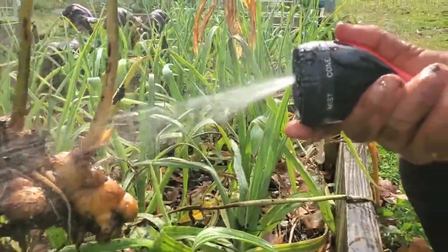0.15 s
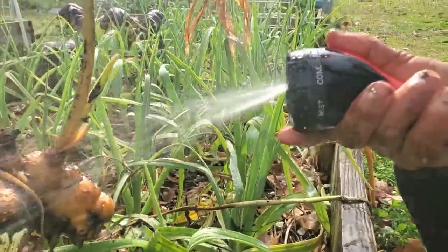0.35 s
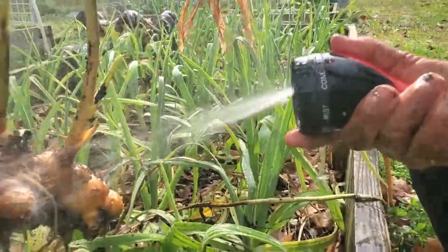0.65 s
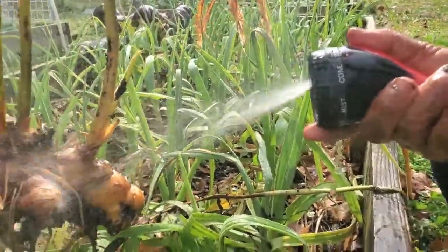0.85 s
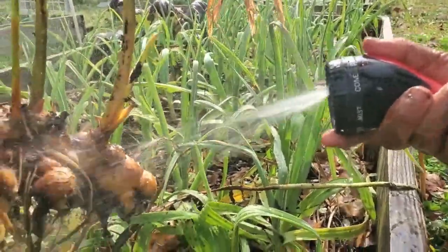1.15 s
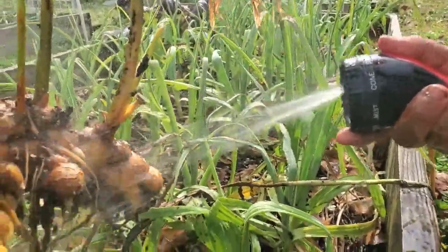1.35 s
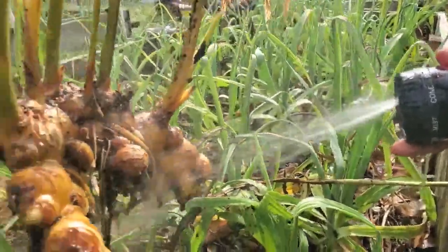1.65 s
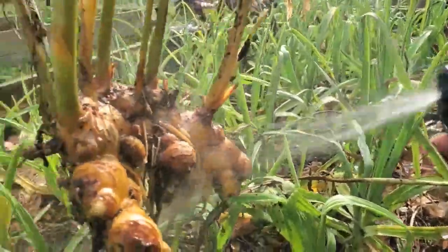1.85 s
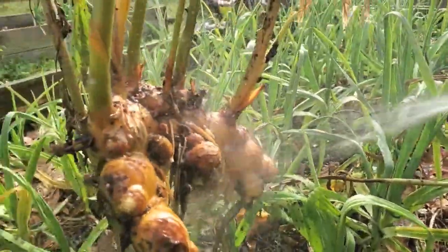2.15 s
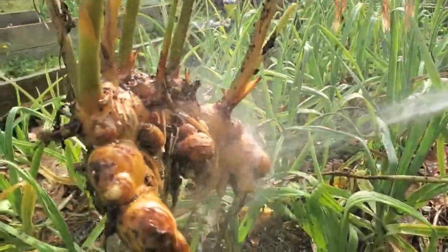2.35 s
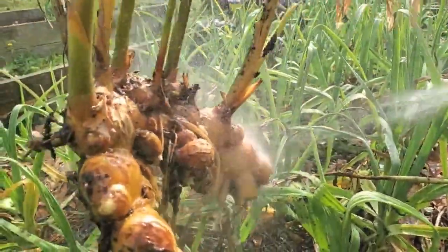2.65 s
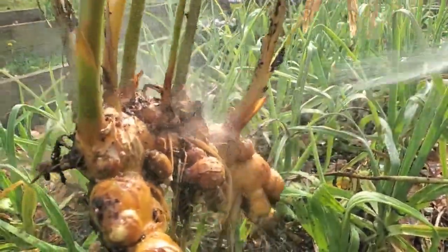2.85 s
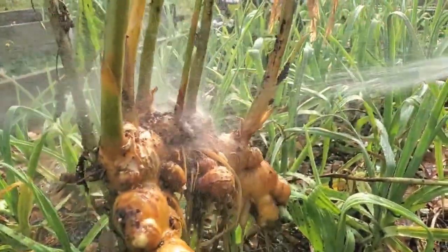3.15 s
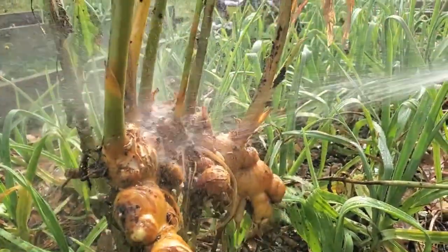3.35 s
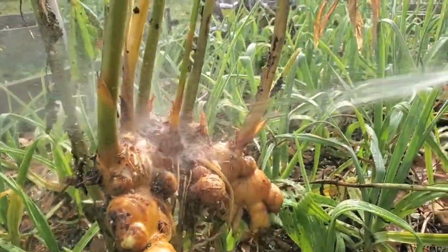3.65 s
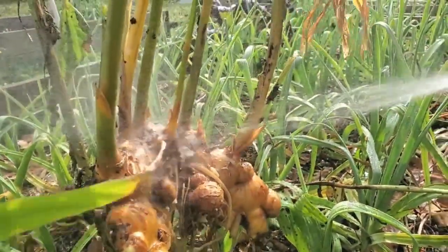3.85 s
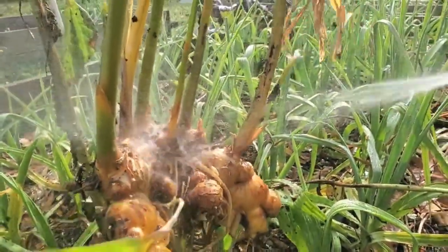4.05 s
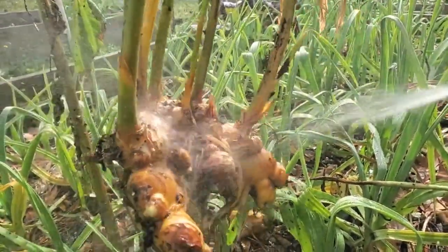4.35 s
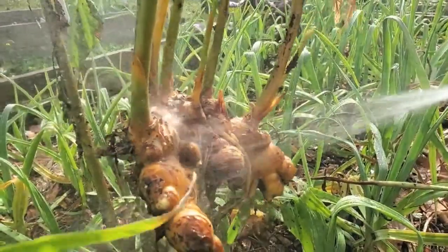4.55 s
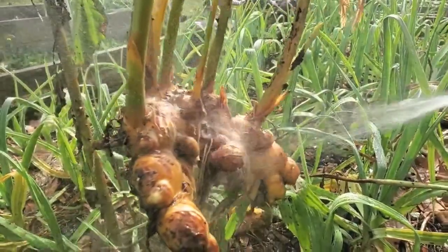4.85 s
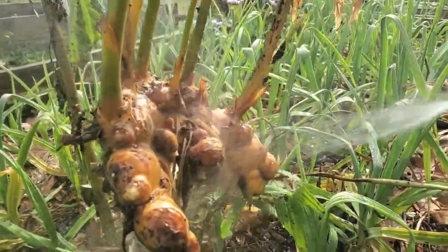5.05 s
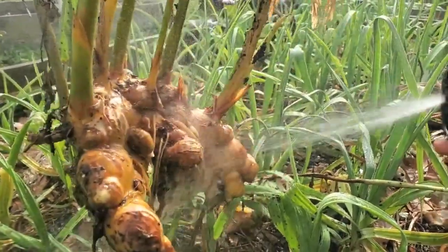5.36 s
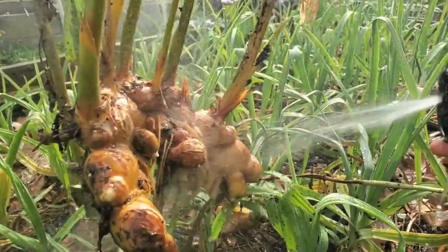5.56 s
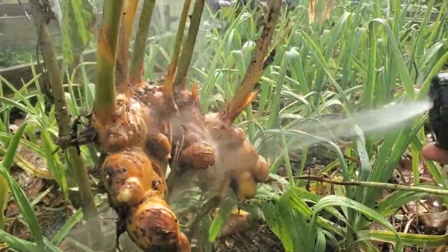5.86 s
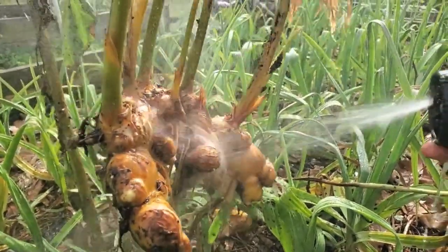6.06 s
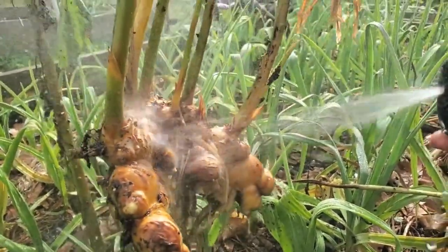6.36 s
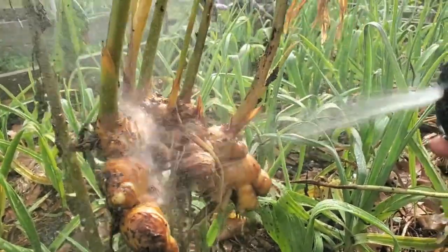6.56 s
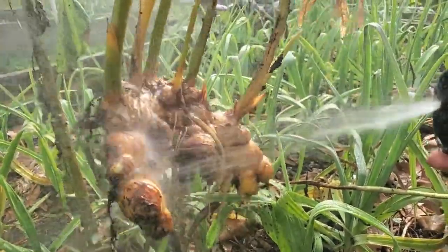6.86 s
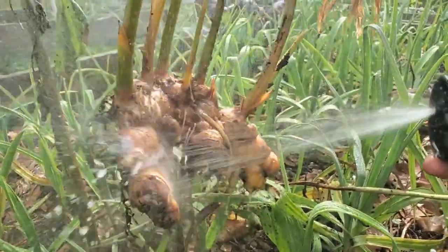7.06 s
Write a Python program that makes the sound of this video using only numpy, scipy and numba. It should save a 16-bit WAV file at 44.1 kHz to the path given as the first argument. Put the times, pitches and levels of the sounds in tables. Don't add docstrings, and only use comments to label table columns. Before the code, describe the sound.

A hose jet strikes a clump of freshly dug roots in an open garden bed, captured close by a hand-held stereo phone for about seven seconds. A dense, bright, steady hiss is already running: thousands of tiny drops crackling on the roots, with thin, very high mist at the nozzle. At 0.1 s the mist dips; from 1 to 1.7 s it is weaker. Around 1.8 s a sudden low wind thump hits the left side and the mist flares, staying fuller afterwards. The splash swells sharply near 2.8 s, then wavers, with a small catch and slip around 4.5 s. Under it, faint run-off patters on soil and leaves, gushing slightly at 3.2 s and briefly, more strongly, at 6.7 s. Soft low buffets recur between 3.6 and 6.7 s. Close, dry, with only short reflections; the spray is still going at the end.

```python
import sys
import numpy as np
from scipy import signal
from scipy.fft import rfft, irfft
from scipy.io import wavfile
from scipy.ndimage import uniform_filter1d
from numba import njit

SR = 44100
rng = np.random.default_rng(int(sys.argv[2]) if len(sys.argv) > 2 else 0)


def to_wav(s):
    ch = np.atleast_2d(s).T
    pcm = np.round(np.clip(ch, -1, 1) * 32767)
    wavfile.write(sys.argv[1], SR, pcm.astype(np.int16))


def undo_db(level):
    steps = np.asarray(level, float) / 20
    return 10 ** steps


N = 318402

# (time [s], level [dB], fine spatter over usual [dB], heavy drops over usual [dB])
SPLASH_DB = [(0, -29.5, 3.5, -1), (.75, -29.5, 1.5, -3.5), (1.3, -30.5, 3, -0.3), (1.8, -30, 1, -1.5),
             (2.03, -33, 0.2, 0.5), (2.67, -29, -4.5, -2), (2.9, -27, -1, -1), (3.17, -28, 2, 1),
             (3.7, -28, -2.7, 0.5), (4.3, -28.5, -1.5, -0.5), (4.75, -30.5, -3, 1.3),
             (5.17, -29.5, 0.5, 0.2), (5.97, -28.5, -3.5, 1.5), (6.41, -29, -0.5, 0.3),
             (6.71, -27, 0.5, -1.2), (7.0, -30.5, 0.5, 2), (7.22, -30, 1, 1.2)]
# (frequency [Hz], density [dB per Hz])
SPLASH_COLOUR_DB = [(2000, -39), (2500, -6.5), (2950, -6.5), (3200, 2.5), (3650, 1.5), (4500, 0.5),
                    (5500, -2.5), (6900, -2.5), (7500, -7), (9000, -7), (11000, -9), (14000, -6)]
# (from [Hz], to [Hz])
SPATTER_HZ = (5500, 7600)
# (from [Hz], to [Hz])
HEAVY_HZ = (3340, 4360)
# (time [s], lead [ms], phase turn [rad])
ROOTS_LEAD_MS = [(0, 0.3, 0), (.9, 0.28, 0), (1.2, 0.16, 0.5), (1.8, 0.16, 0), (1.95, 0.0084, 4),
                 (2.25, -0.044, 3), (2.9, -0.029, 4.5), (3.05, 0.15, 0), (4.6, 0.16, 0), (6.2, 0.16, 0),
                 (6.6, 0.17, 0), (7.22, 0.18, 0)]
# (time [s], share of strays [0-1])
SPLASH_STRAYS = [(0, 0.15), (1.0, 0.22), (1.8, 0.53), (2.2, 0.22), (2.7, 0.37), (3.2, 0.31), (4.5, .35),
                 (5.2, 0.53), (6.4, 0.3), (6.7, .12), (7.22, 0.21)]
# (time [s], half length [s], splash [dB], mist [dB])
JOLTS_DB = [
    (.12, 0.091, -0.5, -4),
    (.82, .1, -1, -1),
    (1.89, .04, 1, 2),
    (2.79, .07, 4.5, 3),
    (4.46, .06, 2, 1),
    (4.53, 0.044, -1.5, -2.5),
    (4.65, 0.11, 1, 2.5),
    (6.67, .08, -1, -0.5),
    (6.92, 0.036, 0, -3),
]
# (time [s], level [dB])
MIST_DB = [(0, -29), (.3, -31), (.72, -32), (.94, -33.5), (1.07, -36), (1.31, -35), (1.69, -35.5),
           (2.07, -30), (2.41, -28.5), (2.67, -30), (3.3, -28), (3.72, -28), (4.2, -29), (4.83, -28.5),
           (5.97, -29.5), (6.17, -27), (6.84, -30), (7.22, -32)]
# (frequency [Hz], density [dB per Hz])
MIST_COLOUR_DB = [(5000, -25), (8500, -13.5), (9380, -7.5), (14700, 1.5), (15200, 0.5), (15800, 6.5)]
# (time [s], lead [ms], phase turn [rad])
NOZZLE_LEAD_MS = [(0, 0.45, -1.5), (.7, 0.65, -3), (1.4, 0.57, -0.5), (2.0, 0.24, 0.5), (2.15, 0.094, 2.7),
                  (2.7, 0.073, 3.5), (3.05, 0.4, 4.5), (4.75, 0.42, 2), (4.95, 0.11, -2.5), (6.2, 0.16, -3),
                  (6.45, 0.43, -4), (7.22, 0.47, -6)]
# (time [s], level [dB], extra on leaves [dB])
PATTER_DB = [(0, -50, 1), (1.5, -50.5, 2), (2.4, -47, -2.5), (3.2, -46, 1.5), (4.3, -48, 0),
             (5.5, -47.5, 1.5), (6.5, -47, .5), (7.22, -47.5, -3.5)]
# (frequency [Hz], density [dB per Hz])
PATTER_COLOUR_DB = [(120, -40), (200, -7.5), (270, -9.5), (390, 0), (480, -8), (660, -1.5), (850, -7.5),
                    (1200, -3.5), (1650, -1), (2200, -0.5), (2700, 1.5), (3200, -17)]
# (time [s], lead [ms], share of strays [0-1])
LEAVES_LEAD_MS = [(0, 0.37, 0.035), (1.1, 0.36, 0.086), (2.0, 0.31, 0.62), (3.0, 0.33, 0.3),
                  (4.6, 0.32, .4), (7.22, 0.28, 0.51)]
# (time [s], half length [s], level [dB])
GUSHES_DB = [
    (3.15, 0.16, 1),
    (6.66, 0.051, 4.5),
]
# (time [s], level [dB], gust edge re level [dB])
WIND_DB = [(0, -45, -8), (.2, -50, -2), (1.6, -48.5, -6.5), (2.0, -40.5, -7), (2.7, -41.5, -9.5),
           (3.4, -45.5, -5.5), (3.9, -41.5, -7), (4.5, -45.5, -6), (5.2, -42, -7), (6.0, -43, -13),
           (6.4, -44.5, -5), (7.22, -43, -10)]
# (frequency [Hz], density [dB per Hz])
WIND_COLOUR_DB = [(12, -43), (20, -17), (45, 0), (70, 6), (173, -11), (200, -27), (260, -36), (440, -120)]
# (frequency [Hz], density [dB per Hz])
EDGE_COLOUR_DB = [(80, 1), (140, 3), (200, -3), (350, -15), (500, -21.5), (800, -38)]
# (time [s], rise time [s], level change [dB], left minus
# right [dB], change of edge re level [dB])
BUFFETS_DB = [(1.755, 0.04, 10, 19, 12), (1.812, 0.014, 4.5, 26, 8), (1.852, 0.046, 7, 27.5, 8),
              (2.13, 0.065, 4.5, 8, -14), (2.27, 0.055, -4, 19, 0), (2.385, .055, 3, 15, 1.5),
              (2.63, .04, 2, 0, -5), (3.58, 0.047, 4, 10, -4), (3.65, 0.048, 8, 5, -4),
              (3.85, .05, 6, 11, -13), (4.04, 0.1, 3.5, 9, -2), (4.44, .05, 4, -1, -4),
              (4.79, .025, 5, 1, -9), (4.87, 0.058, 5, 8, -5), (5.15, 0.046, 6, 15, 0),
              (5.23, 0.027, 2, 11, -9), (5.32, 0.068, 2, 6, -7), (5.63, 0.03, -2, 15, -16),
              (5.69, .03, 6, 8, -10), (5.77, 0.033, 4, 11, -11), (5.99, 0.055, 6.5, 2, -4),
              (6.54, 0.024, 6, 9, -9), (6.62, 0.021, 5, 1.5, -1.5), (6.69, .025, 6, -3, -1)]
# (frequency [Hz], left minus right [dB])
PORTS_DB = [(200, -3.5), (1000, -0.5), (2000, 2), (2800, 1.4), (3300, -1), (4200, 4), (5000, 1.2),
            (5600, 2.5), (7000, 3), (7600, -2.5), (10500, -1.5), (13000, -0.5), (15500, 2.5)]
# (left delay [ms], right delay [ms], level [dB])
BOUNCES_MS = [
    (1.1, 0.784, -17),
    (1.9, 2.3, -15.5),
    (3.1, 2.7, -9),
    (5.3, 6.1, -9),
]


def splash():
    shower = drops(SPLASH_COLOUR_DB, drops_per_s=18000, cycles=3.64, scatter_db=1.0, flicker_db=0.5, surge_db=0.35)
    s, hz = shower[:2]
    db, spatter_db, heavy_db = curves(SPLASH_DB, s)
    jolt_db = bumps(JOLTS_DB, s)[0]
    lead_ms, turn_rad = curves(ROOTS_LEAD_MS, s)
    fine = np.interp(hz, SPATTER_HZ, (0, 1))
    heavy = np.interp(hz, HEAVY_HZ, (1, 0))
    db = db + jolt_db + 3
    db += fine * (spatter_db - 1.4 * jolt_db)
    db += heavy * (heavy_db - 0.21 * jolt_db)
    pan_db = -1.4 - 5 * lead_ms + 0.25 * s
    stray = curves(SPLASH_STRAYS, s)[0]
    return heard(shower, db, pan_db, lead_ms, turn_rad, width_ms=0.014, stray=stray)


def mist():
    usual_db = -29.5
    shower = drops(MIST_COLOUR_DB, drops_per_s=22000, cycles=2.95, scatter_db=1.5, flicker_db=0.7, surge_db=0.38)
    s = shower[0]
    db = curves(MIST_DB, s)[0] + bumps(JOLTS_DB, s)[1]
    lead_ms, turn_rad = curves(NOZZLE_LEAD_MS, s)
    pan_db = 1.5 + 12 * lead_ms - 0.7 * (db - usual_db)
    return heard(shower, db + 3, pan_db, lead_ms, turn_rad, width_ms=0.018, stray=0.48)


def patter():
    shower = drops(PATTER_COLOUR_DB, drops_per_s=5500, cycles=3.27, scatter_db=0.84, flicker_db=0.62, surge_db=0.36)
    s, hz = shower[:2]
    db, leaves_db = curves(PATTER_DB, s)
    lead_ms, leaf_stray = curves(LEAVES_LEAD_MS, s)
    leafy = np.interp(np.log(hz), np.log((750, 2000)), (0, 1))
    soil_stray = np.interp(hz, (300, 600), (0.08, 0.3))
    db = db + bumps(GUSHES_DB, s)[0] + 7.5 + leafy * leaves_db
    stray = soil_stray * (1 - leafy) + leaf_stray * leafy
    return heard(shower, db, 2.4, leafy * lead_ms, 0, width_ms=0.0056, stray=stray)


def wind():
    s, ms = np.arange(N) / SR, np.arange(N) * 1000 // SR
    db, edge_db = curves(WIND_DB, s)
    rise_db, pan_db, bright_db = bumps(BUFFETS_DB, s, tail=1.6)
    db = db + rise_db
    edge_db = edge_db + bright_db
    pan_db = pan_db + 2
    ports_db = np.array([pan_db, -pan_db]) / 2
    hz = np.maximum(np.arange(N // 2 + 1) * SR / N, 1)
    band = (hz < 2000) * (hz > 27)
    shared = 2.4 * undo_db(-1.1 * np.abs(pan_db))
    out = 0
    for colour, layer_db, lumps_db in ((WIND_COLOUR_DB, db, 1.75), (EDGE_COLOUR_DB, db + edge_db, 3.25)):
        noise = rfft(rng.standard_normal((3, N)))
        common, left, right = irfft(noise * undo_db(colour_db(colour, hz)) * band, N)
        air = (np.array([left, right]) + shared * common) / np.sqrt(1 + shared ** 2)
        air = air * undo_db(lumps_db * walk(28, count=2)[:, ms])
        out = out + unit(air) * undo_db(layer_db + 1.4 + ports_db)
    return out


def drops(colour, drops_per_s, cycles, scatter_db, flicker_db, surge_db):
    chance = rng.random((int(drops_per_s * N / SR), 4)).T
    s = chance[0] * N / SR
    lo_hz, hi_hz = colour[0][0], min(colour[-1][0], 0.45 * SR)
    hz = lo_hz * (hi_hz / lo_hz) ** chance[1]
    decay = hz / SR / cycles
    ms, size_class = (s * 1000).astype(int), (chance[1] * 8).astype(int)
    surge = walk(3.78)[0, ms] + walk(12)[0, ms] + walk(60)[0, ms]
    flicker = walk(7, count=8)[size_class, ms]
    flow_db = surge_db * surge + flicker_db * flicker
    strength_db = scatter_db * np.minimum(-np.log(1 - chance[2]), 4)
    size = undo_db(colour_db(colour, hz) + flow_db + strength_db) * np.sqrt(hz * decay)
    return s, hz, decay, size * np.sign(chance[3] - 0.5)


def heard(shower, db, pan_db, lead_ms, turn_rad, width_ms, stray):
    s, hz, decay, size = shower
    place = rng.standard_normal((len(s), 2)).T
    spread_ms = np.where(np.abs(place[1]) < 1.1 * stray, 3, width_ms)
    lag = (lead_ms + spread_ms * place[0]) * SR / 1000
    turn = 2 * np.pi * hz / SR
    power = np.sum(size ** 2 / decay) / N * 0.099
    gain = size * undo_db(db) / np.sqrt(power)
    pan_db = pan_db + colour_db(PORTS_DB, hz)
    left_size = gain * undo_db(pan_db / 2) + 0j
    right_size = gain * undo_db(-pan_db / 2) * np.exp(-1j * turn_rad)
    left = rings(N, s * SR, turn, decay, left_size)
    right = rings(N, np.maximum(s * SR + lag, 0), turn, decay, right_size)
    return np.array([left, right])


@njit
def rings(n, start, turn, decay, size):
    out = np.zeros(n + 4096)
    for k in range(len(start)):
        i = int(start[k]) + 1
        slow, fast = complex(-decay[k], turn[k]), complex(-4 * decay[k], turn[k])
        z = size[k] * np.exp(slow * (i - start[k]))
        w = size[k] * np.exp(fast * (i - start[k]))
        p, q = np.exp(slow), np.exp(fast)
        for j in range(min(int(4 / decay[k]), 4000)):
            out[i + j] += (z - w).imag
            z, w = z * p, w * q
    return out[:n]


def bounced(x):
    at, ms = np.arange(N), np.arange(N) * 1000 // SR
    out = x.copy()
    dull = signal.sosfilt(signal.butter(1, 6000, fs=SR, output="sos"), x)
    for left_ms, right_ms, db in BOUNCES_MS:
        drift_ms = 0.12 * uniform_filter1d(walk(0.805, count=2)[:, ms], size=200, axis=1)
        for port, delay_ms in enumerate((left_ms, right_ms)):
            delay = (delay_ms + drift_ms[port]) * SR / 1000
            out[port] += undo_db(db) * np.interp(at - delay, at, dull[port])
    return out


def bumps(table, s, tail=1.0):
    at, half, *columns = np.transpose(table)
    late = (s[:, None] - at) / np.maximum(half, 0.01)
    late = np.where(late > 0, late / tail, late)
    shape = np.cos(np.clip(late, -1, 1) * np.pi / 2) ** 2
    return [shape @ c for c in columns]


def walk(rate_hz, count=1):
    k = max(int(1000 / rate_hz), 1)
    held = np.repeat(rng.standard_normal((count, N * 1000 // SR // k + 2)), k, axis=1)
    return unit(uniform_filter1d(uniform_filter1d(held, k, axis=1), k, axis=1))


def curves(table, s):
    t, *columns = np.transpose(table)
    return [np.interp(s, t, c) for c in columns]


def colour_db(table, hz):
    f, db = np.transpose(table)
    return np.interp(np.log(hz), np.log(f), db)


def unit(x):
    return x / np.sqrt(np.mean(x ** 2))


def scene():
    return bounced(splash() + mist()) + patter() + wind()


def roll_off(x):
    return signal.sosfilt(signal.butter(12, 16470, fs=SR, output="sos"), x)


def record(dry):
    top = signal.ellip(10, 0.2, 44, 15770, fs=SR, output="sos")
    bottom = signal.butter(3, 33, "high", fs=SR, output="sos")
    mix = signal.sosfilt(np.vstack([top, top, bottom]), dry)
    return roll_off(mix)


dry = scene()
out = record(dry)
to_wav(out)
```